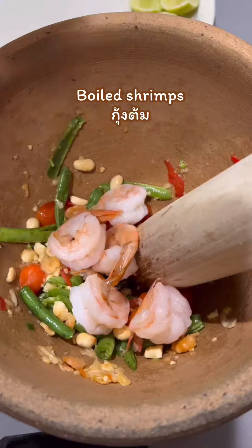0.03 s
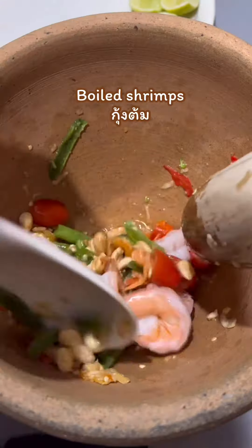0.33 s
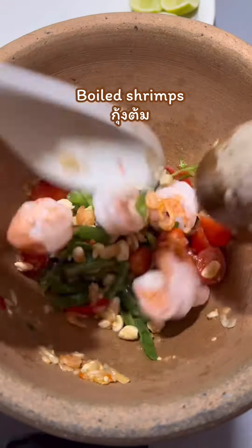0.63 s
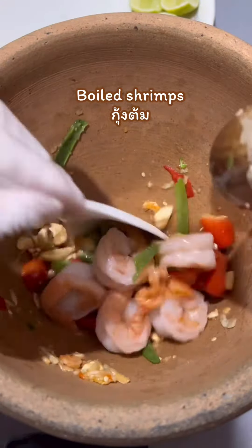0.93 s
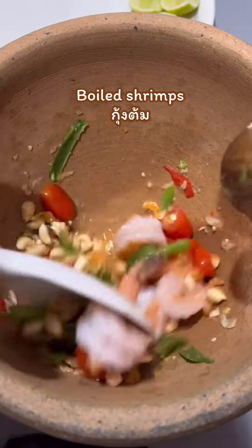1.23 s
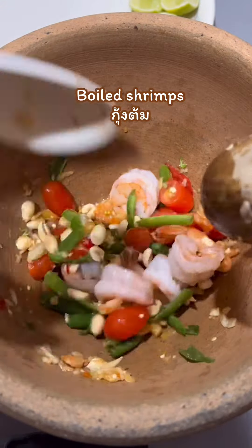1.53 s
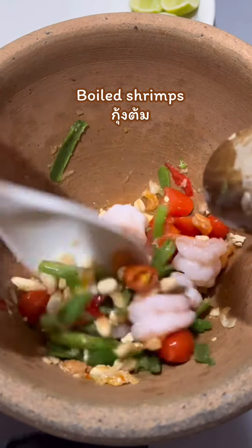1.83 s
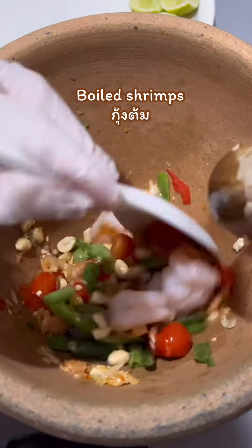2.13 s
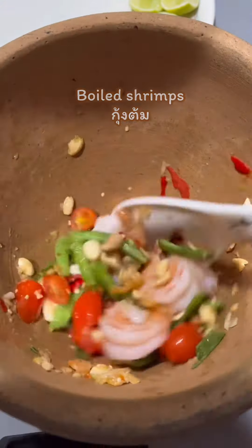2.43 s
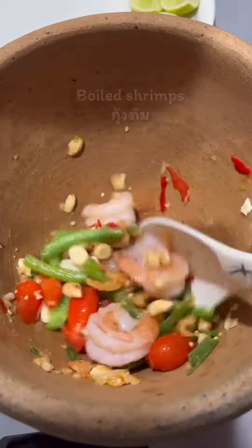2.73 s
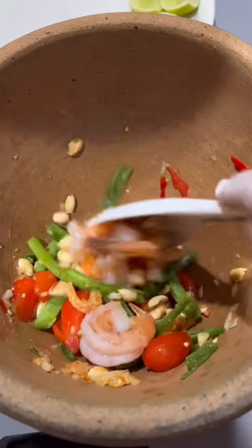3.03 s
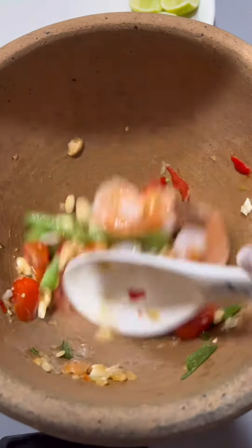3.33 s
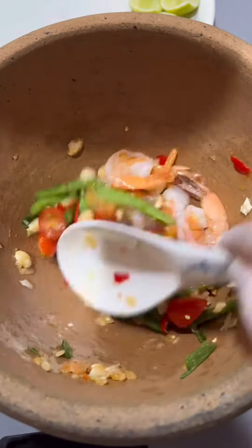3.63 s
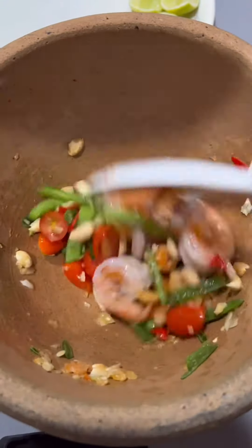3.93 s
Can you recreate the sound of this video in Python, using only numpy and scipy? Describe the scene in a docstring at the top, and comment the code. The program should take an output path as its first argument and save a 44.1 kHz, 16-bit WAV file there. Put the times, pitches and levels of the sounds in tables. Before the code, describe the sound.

A spoon tosses wet salad in a clay mortar, each uneven stroke tapping and rasping along the wall. Pieces fall back with small wet pops and soft thuds, heard close up in a quiet kitchen.

```python
"""Tossing salad in a clay mortar

A spoon turns wet salad, close up in a quiet kitchen. Each stroke taps the wall and rasps
along the clay, sounding the hollow of the bowl. Shrimps, beans and peanuts fall back with
small wet pops and soft thuds, and the dressing spatters and fizzes under the spoon."""
import sys
import numpy as np
from scipy import signal
from scipy.fft import rfft, irfft, next_fast_len
from scipy.io import wavfile
from scipy.ndimage import uniform_filter1d, map_coordinates

SR = 44100
rng = np.random.default_rng(int(sys.argv[2]) if len(sys.argv) > 2 else 0)


def to_wav(s):
    """Save 16-bit WAV."""
    ch = np.atleast_2d(s).T  # columns
    pcm = np.round(np.clip(ch, -1, 1) * 32767)  # PCM
    wavfile.write(sys.argv[1], SR, pcm.astype(np.int16))


N = 176400

# Kitchen air fader: time_s, level_db
AIR_FADER = [(0, -68), (.66, -71), (1.1, -55.5), (1.52, -64), (1.9, -54.5), (2.3, -59.5), (3.2, -55.5),
             (3.53, -65), (3.7, -56), (3.85, -55.5)]
# Kitchen reverb decay: frequency_hz, t60_s
ROOM_DECAY = [(150, 0.66), (1500, 0.18), (6000, 0.33), (15000, 0.4)]
# Brief dips in the whole mix: centre_s, half_width_s, depth_db
LEVEL_DIPS = [(0.298, 0.042, 26), (2.392, 0.047, 38)]
# Spoon sweeps through the salad: peak_s, swell_s, fade_s, rasp_db, grit_db, hollow_db
SPOON_SWEEPS = [(0.361, 0.17, 0.059, -51, -53, -60), (0.458, 0.067, 0.08, -32.5, -41, -53.5),
                (0.727, 0.022, 0.05, -30.5, -29.5, -37.5), (0.856, 0.059, 0.05, -19, -25.5, -38.5),
                (0.965, 0.035, 0.065, -51, -69, -75), (1.17, 0.083, 0.12, -51, -48, -51.5),
                (1.296, 0.071, 0.061, -28, -31, -48.5), (1.624, 0.049, 0.0085, -32, -27, -41.5),
                (1.676, 0.044, 0.12, -25, -27.5, -39.5), (2.024, 0.022, 0.051, -37.5, -31, -51),
                (2.07, 0.031, 0.086, -32, -28.5, -42), (2.691, 0.015, 0.05, -20.5, -20, -32),
                (2.756, 0.039, 0.014, -29.5, -31, -49), (2.985, 0.031, 0.029, -26.5, -19.5, -35),
                (3.286, 0.028, 0.053, -44.5, -40, -42.5), (3.364, 0.075, 0.049, -32, -31.5, -44),
                (3.589, 0.011, 0.054, -33.5, -42.5, -50), (3.642, 0.038, 0.027, -32.5, -38.5, -42),
                (3.871, 0.018, 0.046, -41.5, -29, -37.5), (3.922, 0.04, 0.074, -37.5, -30, -45.5)]
# Wet pieces parting and landing: start_s, level_db, pitch_hz
WET_POPS = [(0.4449, -15.5, 1670), (0.4881, -14.5, 2180), (0.5816, -29.5, 3620), (0.9033, -19.5, 2010),
            (0.9443, -26, 1350), (0.9629, -28, 2050), (.974, -25.5, 1540), (1.142, -25.5, 3680),
            (1.173, -22, 2870), (1.288, -12, 2070), (1.304, -14.5, 1740), (1.337, -11.5, 1810),
            (1.663, -8, 2800), (1.8532, -23, 1360), (2.2357, -18, 3160), (2.316, -26.5, 1770),
            (2.542, -29.5, 2160), (2.6134, -19.5, 1346), (2.653, -17, 1800), (2.76, -16.5, 1660),
            (2.7905, -11, 1820), (2.8425, -21, 1930), (3.173, -30, 2500), (3.3393, -18.5, 1610),
            (3.3929, -22.5, 1480), (3.432, -22, 5860), (3.929, -19, 1940), (3.961, -16, 2400),
            (3.9707, -17.5, 2330)]
# Spoon hits on clay: start_s, knock_db, clack_db, snap_db
SPOON_TAPS = [(0.71, -36.5, -29, -15.5), (0.7251, -56, -30, -49), (0.8, -69, -62, -29.5),
              (1.3253, -60, -20, -24.5), (1.562, -30, -51, -12.5), (1.568, -44, -25.5, -25),
              (1.576, -33, -23.5, -24), (1.615, -31, -26.5, -32), (1.649, -33, -22.5, -19.5),
              (1.701, -29, -27.5, -14), (2.004, -31, -16.5, -19.5), (2.183, -60, -45, -32.5),
              (2.6255, -12.5, -17.5, -16.5), (2.661, -37.5, -26, -27.5), (2.6778, -28.5, -31, -15),
              (2.943, -35, -44.5, -29.5), (2.9542, -56, -24, -31), (2.969, -43, -25, -10),
              (2.9726, -51, -33, -18.5), (3.055, -66, -32.5, -33.5), (3.0793, -60, -24.5, -33),
              (3.281, -46, -30, -31.5), (3.575, -32, -13, -28), (3.858, -25.5, -27.5, -18.5),
              (3.8684, -32, -28.5, -67.5)]
# Soft weight shaking mortar and counter: start_s, thud_db, boom_db
BOWL_THUDS = [(0.713, -38.5, -48.5), (0.852, -41.5, -52.5), (1.293, -49.5, -37.5), (1.566, -36, -50.5),
              (2.007, -39.5, -41), (2.626, -38, -49), (2.955, -39, -40.5), (2.989, -37, -40),
              (3.277, -41, -37), (3.371, -48, -45.5), (3.859, -31.5, -37), (3.96, -51, -38.5)]
# Dressing smeared under the spoon: peak_s, half_length_s, level_db
DRESSING_SMEARS = [(1.413, 0.018, -41), (3.317, 0.038, -33), (3.378, 0.019, -35.5), (3.634, 0.017, -39)]

# EQ curves: frequency_hz, gain_db
HUM_EQ = [(20, -40.5), (40, -10.5), (90, 2.5), (130, -3), (500, -28), (1500, -60)]  # low room tone
AIR_EQ = [(100, -22.5), (550, 4), (2200, 7), (4000, 1), (7000, 1.5), (11000, -6.5), (16000, -21.5)]  # soft room hiss
RASP_EQ = [(200, -47.5), (800, -23), (1200, -6.5), (1700, -3), (2500, 1), (3400, -7.5), (5000, -11.5),
           (9000, -25)]  # midrange scrape of clay
GRIT_EQ = [(900, -54.5), (2500, 3.5), (4000, 0), (6500, 4.5), (9000, 5), (11000, -0.5), (13000, -6),
           (16000, -10)]  # bright, sandy top
CLACK_EQ = [(200, -22.5), (800, -9), (1600, -2.5), (3000, -2), (4300, 0), (6000, -4), (12000, -39.5)]  # body of a spoon hit
THUD_EQ = [(25, -32), (90, 4), (200, 6), (400, -2.5), (900, -37.5)]  # weight of the bowl
SMEAR_EQ = [(4000, -30), (8500, -4.5), (11000, 2.5), (15500, -12.5)]  # fizz of the dressing
SIDE_EQ = [(60, -28.5), (300, -12), (1100, -8.5), (2200, -24), (4000, -13.5), (5500, -4.5), (10000, -0.5)]  # stereo width

# Resonances: centre_hz, bandwidth_hz, gain_db
HOLLOW_MODES = [(428, 90, -9.5), (552, 59, 6)]  # air in the bowl
CLAY_MODES = [(1717, 53, 2.5), (2150, 45, -3.5), (2684, 10, -5), (3016, 23, 0), (4086, 28, -3),
              (5940, 96, 1.5), (6850, 60, 3), (8450, 53, -5.5)]  # spoon and mortar ringing
FAR_WALL_MODES = [(1268, 91, 4.5), (1690, 760, -4.5)]  # lower ring of the far wall
HALO_MODES = [(1450, 200, -1), (2960, 63, 4), (5076, 110, 0.5), (7300, 350, -4)]  # faint ringing ahead of one tap

TURN_S = 2.4  # the spoon changes sides


def amp(db):
    """Decibels to gain."""
    return 10 ** (np.asarray(db) / 20)


def unit(x):
    """Scale to rms 1."""
    return x / np.sqrt(np.mean(x ** 2) + 1e-20)


def unit_hit(x):
    """Scale a hit to the energy of 4 ms at rms 1."""
    return x * np.sqrt(.004 * SR / np.sum(x ** 2, axis=-1, keepdims=True))


def noise(length=N):
    """Two rows of white noise: one for the mid, one for stereo spread."""
    return rng.standard_normal((2, length))


def along(curve, hz):
    """Read a curve on a log frequency axis."""
    freqs, values = np.transpose(curve)
    return np.interp(np.log(hz + 1), np.log(freqs + 1), values)


def filtered(x, response):
    """Apply a complex frequency response."""
    n = x.shape[-1]
    size = 2 * next_fast_len(n // 2 + SR // 20)
    return irfft(rfft(x, size) * response(np.fft.rfftfreq(size, 1 / SR)), size)[..., :n]


def eq(x, curve):
    """Minimum-phase EQ, so nothing rings ahead of an attack."""
    def response(hz):
        cepstrum = irfft(np.log(amp(along(curve, hz))))
        half = len(cepstrum) // 2
        cepstrum[1:half] *= 2
        cepstrum[half + 1:] = 0
        return np.exp(rfft(cepstrum))
    return filtered(x, response)


def resonate(x, modes):
    """Parallel band-pass resonators."""
    def response(hz):
        return sum(amp(db) * 1j * hz * width / (centre ** 2 - hz ** 2 + 1j * hz * width)
                   for centre, width, db in modes)
    return filtered(x, response)


def ring(x, strength=1):
    """Add the short ring of spoon and mortar."""
    return x + strength * resonate(x, CLAY_MODES)


def add(track, start_s, sound):
    """Mix a sound in at start_s."""
    part = track[:, round(start_s * SR):][:, :sound.shape[-1]]
    part += sound[..., :part.shape[1]]


def hit_envelope(t60_s, rise_s):
    """Quick attack, exponential decay."""
    t = np.arange(SR // 6) / SR
    return amp(-60 * t / t60_s) * (1 - np.exp(-t / rise_s))


def burst(t60_s, rise_s):
    """A decaying noise hit."""
    env = hit_envelope(t60_s, rise_s)
    return env * noise(len(env))


def struck_tone(hz, t60_s, rise_s):
    """A decaying sine hit."""
    env = hit_envelope(t60_s, rise_s)
    return env * np.sin(2 * np.pi * hz * np.arange(len(env)) / SR)


def kitchen(source):
    """The walls return a short reverb over a bed of low hum and quiet air."""
    hz, t, spectrum = signal.stft(noise(SR // 2), SR, nperseg=256)
    decay = amp(-60 * t / along(ROOM_DECAY, hz)[:, None])
    tail = signal.istft(spectrum * decay, SR, nperseg=256)[1]
    reverb = signal.fftconvolve(source, tail / np.linalg.norm(tail[0]), axes=1)[:, :N]
    hum = unit(eq(noise(), HUM_EQ))
    air = unit(eq(noise(), AIR_EQ))
    air_db = np.interp(np.arange(N) / SR, *np.transpose(AIR_FADER))
    return amp(-14.5) * reverb + amp(-58) * hum + amp(air_db) * air


def slips(per_s, spread_db):
    """Friction as tiny random clicks of uneven size."""
    fires = rng.random(N) < per_s / SR
    sizes = amp(spread_db * np.clip(rng.standard_normal(N), -2, 2))
    return fires * sizes * noise()


def pockets(x, depth_db=5.5):
    """Pockets in the salad open and close: resonances come and go at random."""
    spectrum = signal.stft(x, nperseg=512)[2]
    patches = uniform_filter1d(rng.standard_normal(spectrum.shape[1:]), size=3, axis=0)
    patches = unit(uniform_filter1d(patches, size=5, axis=1))
    return unit(signal.istft(spectrum * amp(depth_db * patches), nperseg=512)[1][:, :N])


def stutter(per_s, depth_db):
    """The spoon catches and slides: a smooth random flutter in gain."""
    wobble = map_coordinates(rng.standard_normal(N // 20), [np.arange(N) * per_s / SR], mode="wrap")
    return unit(amp(depth_db * wobble))


def scraping():
    """The spoon stutters over wet, gritty clay, ringing the wall and the hollow."""
    t = np.arange(N) / SR
    power = np.zeros((3, N))
    for peak_s, swell_s, fade_s, *levels_db in SPOON_SWEEPS:
        away = np.maximum((peak_s - t) / swell_s, (t - peak_s) / fade_s)
        near = away < 5
        power[:, near] += np.outer(amp(levels_db), amp(-20 * away[near] ** 1.45)) ** 2
    rasp_env, grit_env, hollow_env = np.sqrt(power)
    rasp = pockets(ring(eq(slips(per_s=2600, spread_db=-1), RASP_EQ)))
    grit = pockets(ring(eq(slips(per_s=6000, spread_db=3), GRIT_EQ)))
    hollow = unit(resonate(noise(), HOLLOW_MODES))
    scrape = amp(-1) * rasp_env * rasp + amp(-1.14) * grit_env * grit + hollow_env * hollow
    return stutter(per_s=220, depth_db=1.5) * scrape + wetness(rasp_env, grit_env)


def droplets(low_hz, high_hz, count, t60_cycles=13):
    """Tiny wet cavities snap open, each ringing for a moment at its own pitch."""
    when, pitch, size, pan = rng.random((count, 4)).T[:, :, None]
    age = np.arange(SR // 80)
    hz = low_hz * (high_hz / low_hz) ** pitch
    cycles = hz * age / SR
    grains = np.sqrt(hz) * amp(14 * size - 60 * cycles / t60_cycles) * np.sin(2 * np.pi * cycles)
    at = ((when * N).astype(int) + age).ravel()
    return np.array([unit(np.bincount(at, (grains * gain).ravel(), N)[:N]) for gain in (1, 2 * pan - 1)])


def wetness(rasp_env, grit_env, settle_s=0.041):
    """Moist pieces settle after each toss, leaves crackle faintly and dressing spatters."""
    release = np.exp(-1 / (settle_s * SR))
    lingering = np.sqrt(signal.lfilter([1 - release], [1, -release], rasp_env ** 2))
    stirred = np.arange(N) / SR > SPOON_SWEEPS[0][0]
    settling = amp(-19) * lingering * droplets(1200, 3300, count=800)
    crackle = amp(-64.5) * stirred * droplets(1100, 11000, count=150)
    spatter = amp(-6) * grit_env * droplets(4500, 11000, count=1000)
    return settling + crackle + spatter


def wet_pops(t60_cycles=22, glide=0.14):
    """Pieces part and land: each is a falling blip, a squelch and a tick on the clay."""
    out = np.zeros((2, N))
    for start_s, level_db, hz in WET_POPS:
        env = hit_envelope(t60_cycles / hz, rise_s=0.00047)
        blip = env * np.sin(2 * np.pi * np.cumsum(hz * (1 + glide * env)) / SR)
        squelch = unit(resonate(noise(len(env)), [(hz, 0.35 * hz, 0)]))
        tick = unit(eq(noise(len(env)), RASP_EQ))
        pop = env * (0.29 * squelch + 0.18 * tick)
        pop[0] += 0.48 * blip  # mid only
        add(out, start_s + 0.000882, amp(level_db + 3.5) * pop)
    return ring(out, strength=0.5)


def contact(t60_s, curve):
    """One hard strike inside a brief crunch of grit sets the clay ringing."""
    crunch = burst(t60_s, rise_s=0.0004)
    crunch[:, round(0.0015 * SR)] += amp(15)  # the strike
    return unit_hit(ring(eq(crunch, curve), strength=1.47))


def taps():
    """The spoon meets the wall: a hollow knock, a clack and a bright snap."""
    out = np.zeros((2, N))
    knock = unit_hit(struck_tone(hz=541, t60_s=0.016, rise_s=0.0033)) * np.array([[1], [0]])  # mid only
    for start_s, knock_db, clack_db, snap_db in SPOON_TAPS:
        clack = contact(t60_s=0.016, curve=CLACK_EQ)
        snap = contact(t60_s=0.018, curve=GRIT_EQ)
        add(out, start_s, amp(knock_db) * knock + amp(clack_db) * clack + amp(snap_db) * snap)
    return out


def thuds():
    """The heavy bowl passes each push to the counter, which booms softly."""
    out = np.zeros((2, N))
    boom = 2 * struck_tone(hz=65.7, t60_s=0.17, rise_s=0.013)
    for start_s, thud_db, boom_db in BOWL_THUDS:
        thud = unit_hit(eq(burst(t60_s=0.083, rise_s=0.0011), THUD_EQ))
        add(out, start_s, amp(thud_db + 3.5) * thud + amp(boom_db) * boom)
    return out


def swell(peak_s, half_s, steepness=2):
    """A bell-shaped fade in and out; more steepness flattens its top."""
    return np.exp(-((np.arange(N) / SR - peak_s) / half_s) ** steepness)


def dressing():
    """Tiny wet films break under the spoon in a high fizz."""
    env = sum(amp(db) * swell(peak_s, half_s) for peak_s, half_s, db in DRESSING_SMEARS)
    return env * pockets(eq(slips(per_s=1900, spread_db=5), SMEAR_EQ))


def faint_halo():
    """A faint, brief ringing tone swells just before one sharp tap."""
    ringing = unit(resonate(resonate(noise(), HALO_MODES), HALO_MODES))
    return amp(-28.5) * swell(peak_s=3.5705, half_s=0.0075) * ringing


def scene():
    """Mortar and kitchen in mid and side: the bass is central, the treble leads on the right."""
    mortar = taps() + faint_halo() + scraping() + dressing() + wet_pops() + thuds()
    mix = mortar + kitchen(mortar)
    turned = np.arange(N) / SR > TURN_S
    mid, spread = mix + resonate(mix * turned, FAR_WALL_MODES)
    lagging_mid = filtered(mid, lambda hz: -1j)  # a quarter cycle behind
    coherence = 0.92
    side = coherence * lagging_mid + np.sqrt(1 - coherence ** 2) * spread
    side = filtered(side, lambda hz: amp(along(SIDE_EQ, hz)))
    return np.array([mid + side, mid - side])


def record(dry):
    """Master chain: two brief dips in level, a soft clip and a steep high cut."""
    ceiling, cutoff_hz = 0.75, 16100
    dip_db = sum(db * swell(centre_s, half_s, steepness=4) for centre_s, half_s, db in LEVEL_DIPS)
    dipped = dry * amp(-dip_db)
    rounded = dipped / (1 + np.abs(dipped / ceiling) ** 6) ** (1 / 6)
    return filtered(rounded, lambda hz: np.clip((cutoff_hz - hz) / 500 + .5, 0, 1))


dry = scene()
out = record(dry)
to_wav(out)
```